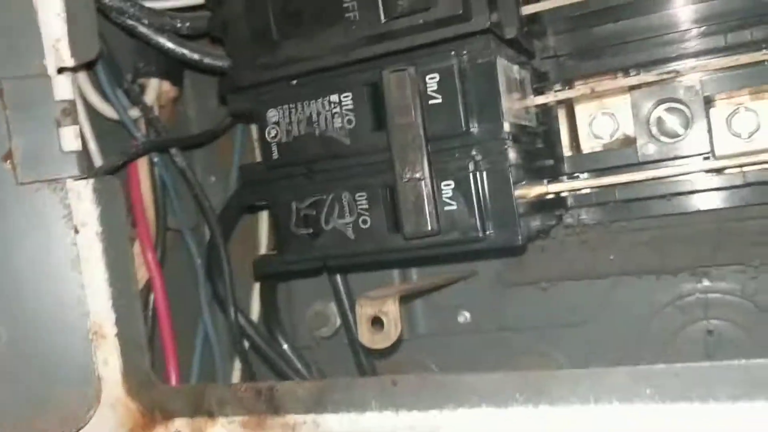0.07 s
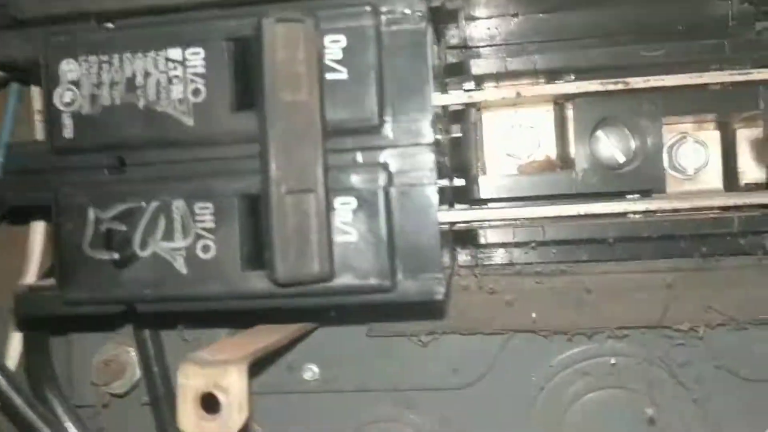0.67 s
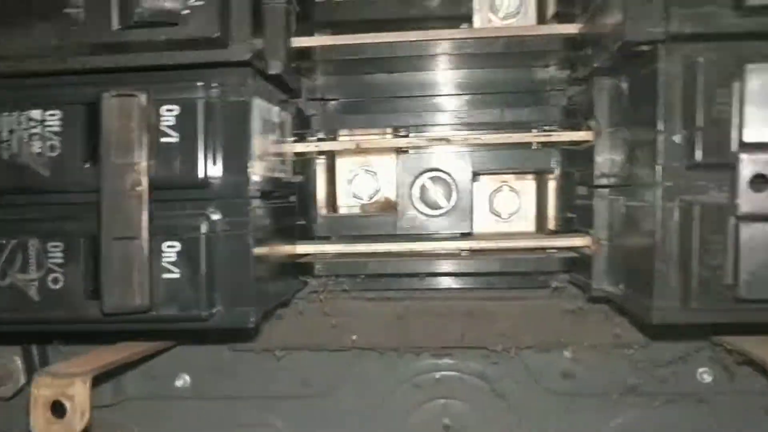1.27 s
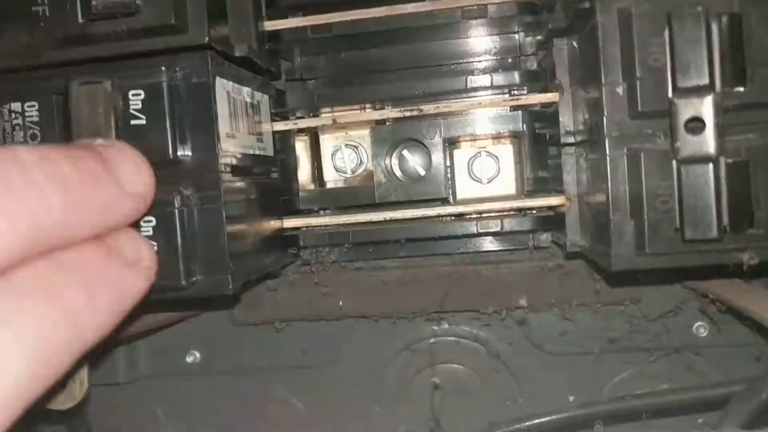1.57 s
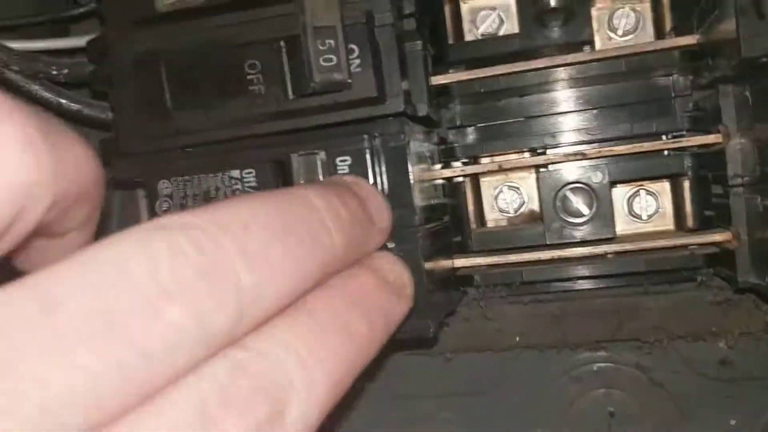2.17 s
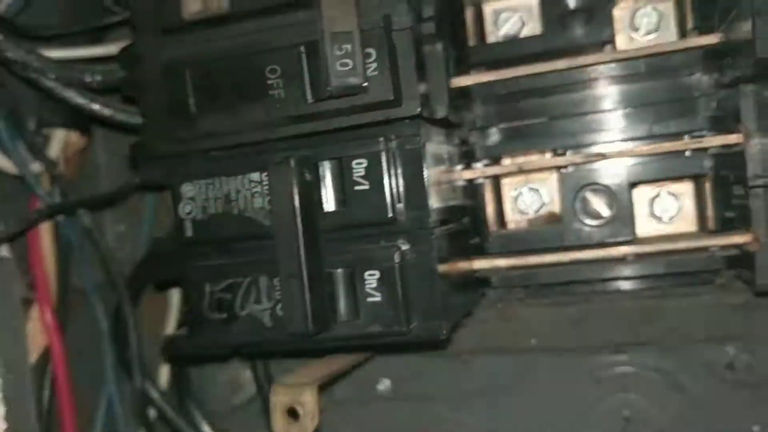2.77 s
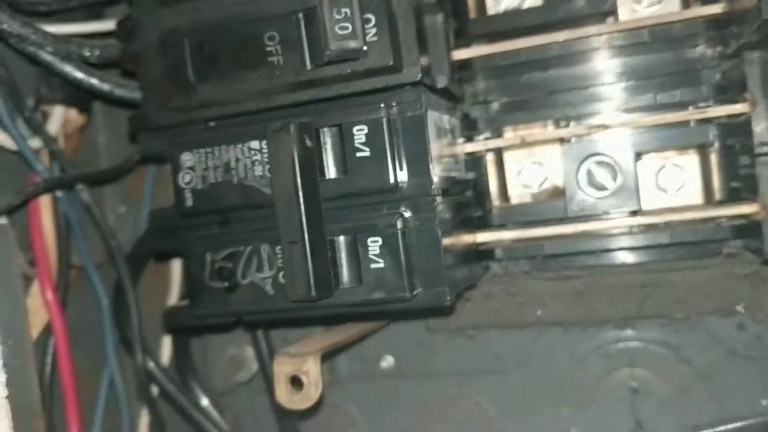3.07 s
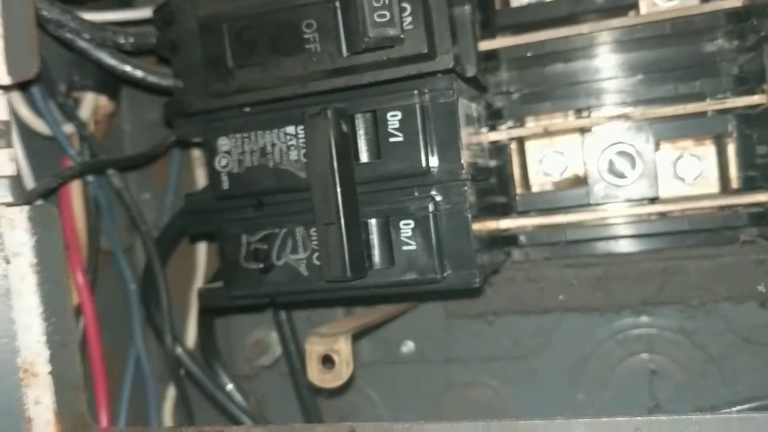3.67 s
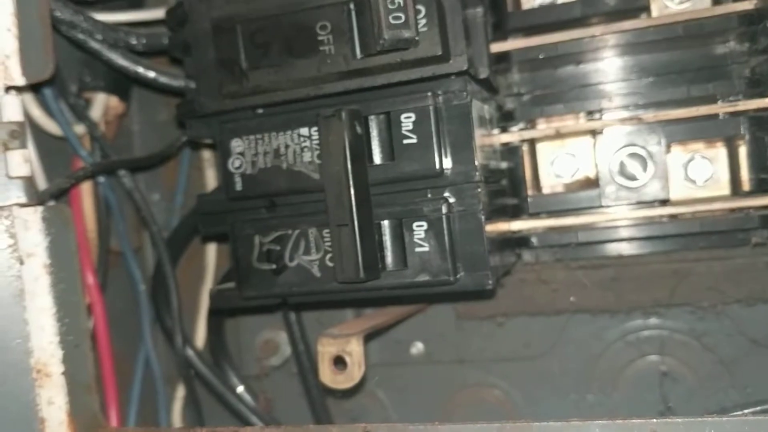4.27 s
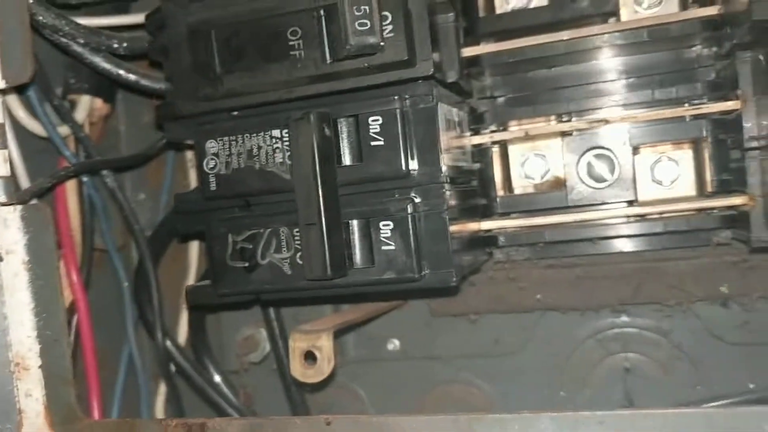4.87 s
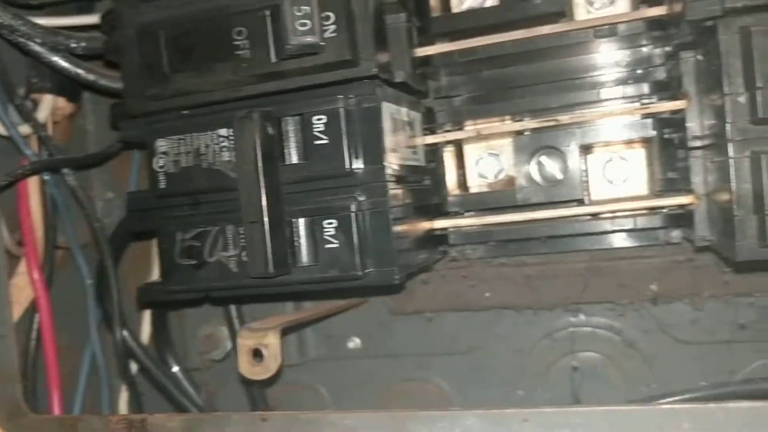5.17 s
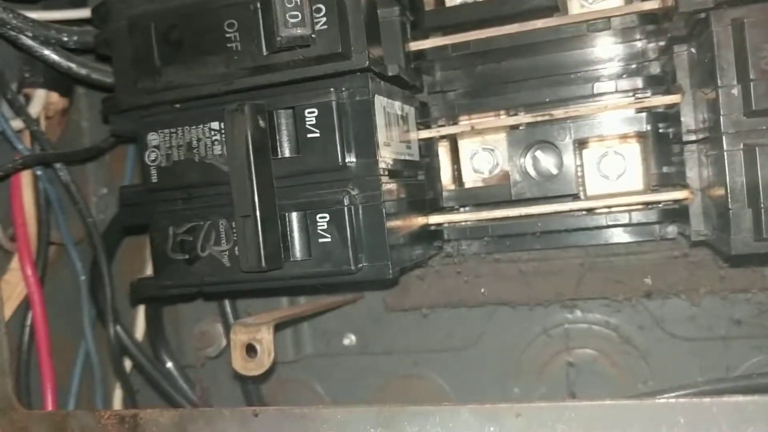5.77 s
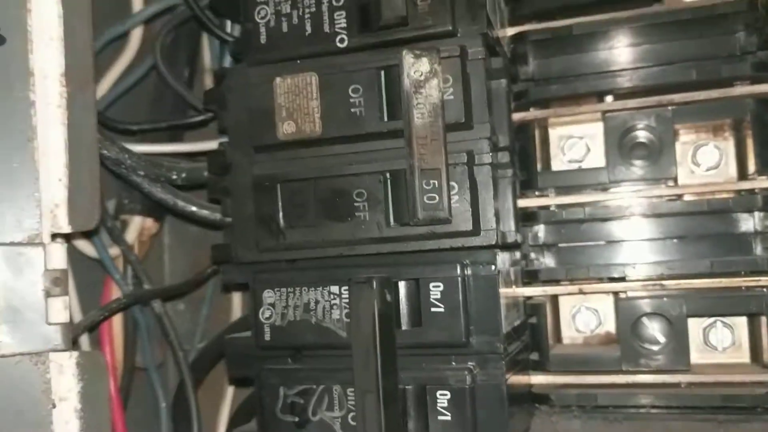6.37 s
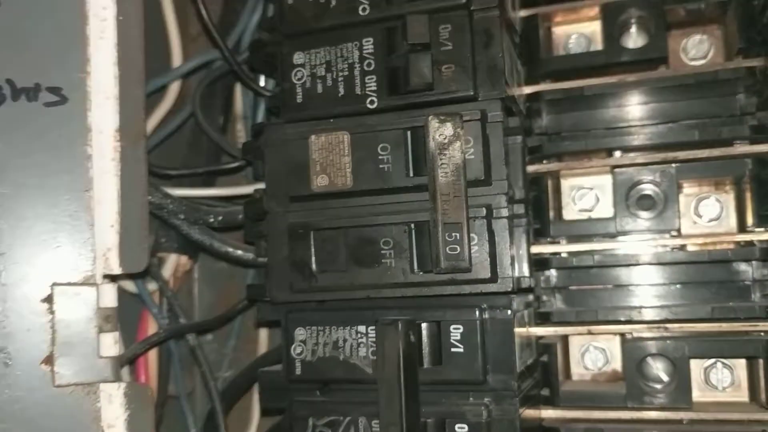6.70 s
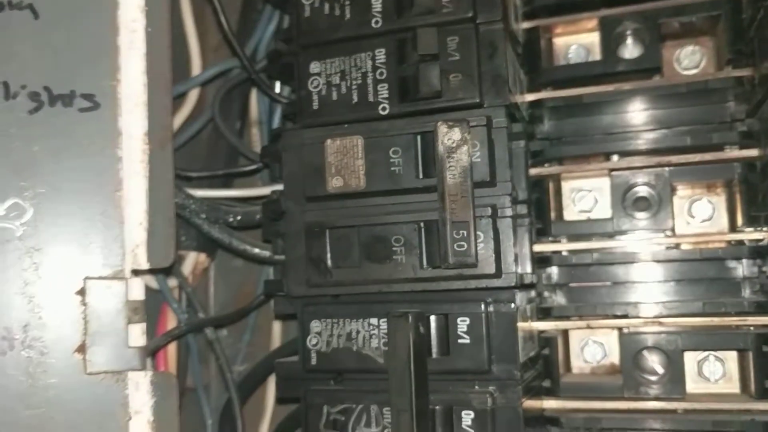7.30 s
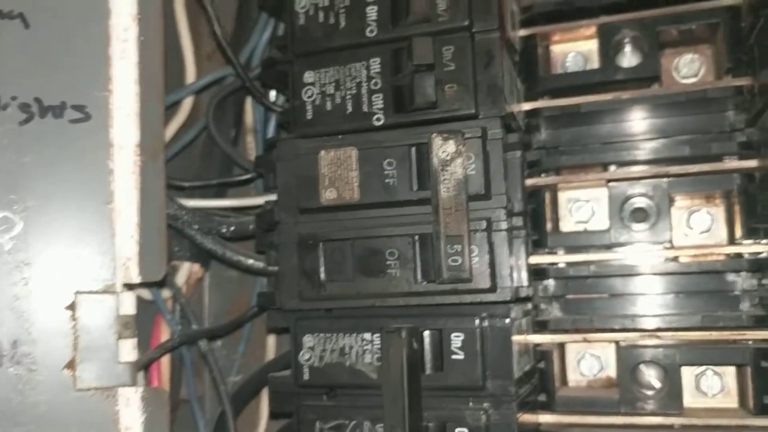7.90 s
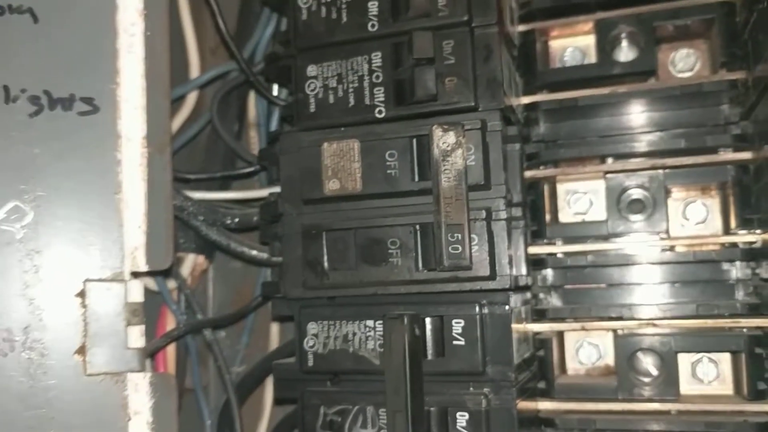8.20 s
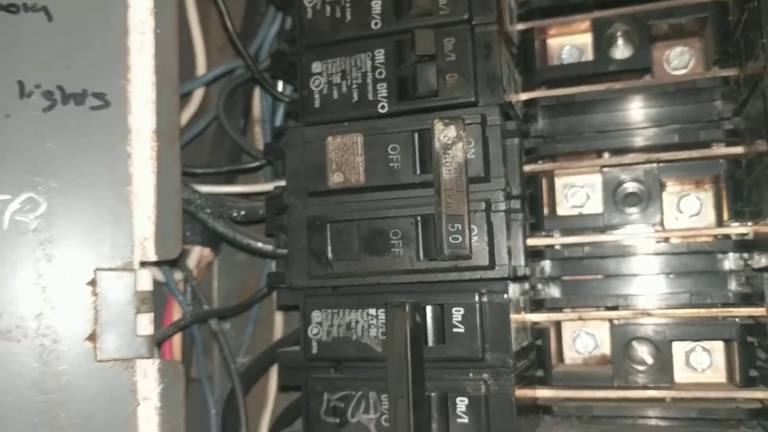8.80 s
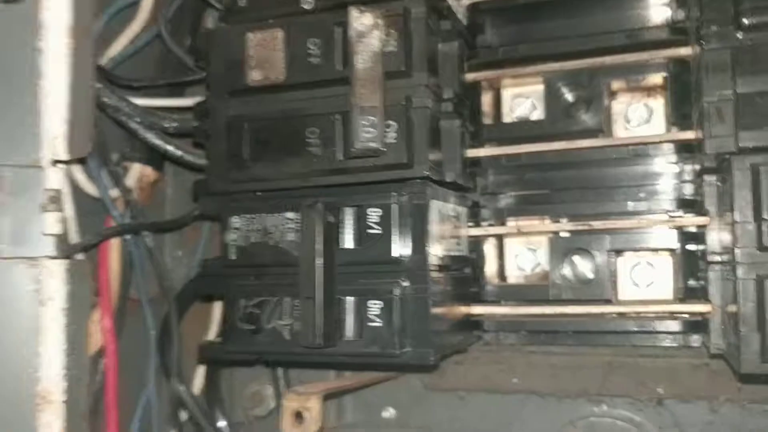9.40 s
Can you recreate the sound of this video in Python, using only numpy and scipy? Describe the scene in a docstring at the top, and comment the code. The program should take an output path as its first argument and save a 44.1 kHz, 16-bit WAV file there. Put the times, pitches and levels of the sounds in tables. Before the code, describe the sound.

Close by in a small room, a faint low hum carries a few tiny crackles. After about two seconds, fingers bump softly on a circuit breaker handle, and it snaps over with one loud, sharp clack. The steel panel rings briefly and fades. The quiet hum goes on with thin hiss and a faint distant rumble, and light crackling returns near the end.

```python
"""Circuit breaker thrown in a steel panel

Two fingers throw a double-pole breaker in an open panel, close by, in a small room.
The hand bumps softly, the latch ticks, the spring snaps the contacts over with a loud clack,
and the steel box rings on. Around it: faint bursts of crackle, low room hum, a swelling
distant rumble, thin hiss and electronic whine."""
import sys
import numpy as np
from scipy import signal
from scipy.fft import rfft, irfft, next_fast_len
from scipy.io import wavfile

SR = 44100
rng = np.random.default_rng(int(sys.argv[2]) if len(sys.argv) > 2 else 0)


def int16_out(signal):
    """Quantize to a 16-bit WAV file."""
    q = np.round(np.clip(np.atleast_2d(signal).T, -1, 1) * 32767)
    wavfile.write(sys.argv[1], SR, q.astype(np.int16))


N = 425565

# standing waves of the room: f/Hz, width/Hz, boost/dB
STANDING_WAVES = [(58.4, 4, 3), (119, 3.1, 5), (142.85, 6, 6), (183, 10, 8.5), (240.74, 8.1, 10),
                  (270, 10, 9), (328, 12.01, 8.1), (475, 8.8, 7.4)]
# spells of weak ticks over a fine sizzle: start/s, end/s, tick peak/dB, sizzle level/dB
CRACKLE_SPELLS = [(0, .24, -67, -75), (1.772, 2.123, -65, -86), (6.832, 6.87, -63, -85),
                  (7.35, 7.66, -66.5, -86), (8.124, 8.58, -64, -84), (8.593, 8.925, -62.5, -70.5),
                  (8.99, 9.372, -63.5, -75)]
SPELL_FADE_DB_PER_S = 7


def from_db(db):
    """Decibels to gain."""
    return 10 ** (np.asarray(db) / 20)


def unit_rms(x):
    """Scale to rms 1."""
    return x / np.sqrt(np.mean(x ** 2) + 1e-20)


def at_hz(table, hz, column=1):
    """Interpolate a table column over log frequency."""
    rows = np.array(table)
    return np.interp(np.log(hz + 1e-3), np.log(rows[:, 0]), rows[:, column])


def seconds(length_s):
    """Time axis."""
    return np.arange(int(length_s * SR)) / SR


def add(track, start_s, sound):
    """Mix a sound into a track."""
    start = round(start_s * SR)
    track[start:start + len(sound)] += sound[:len(track) - start]


def cut(x, hz, side):
    """Second-order high- or low-pass."""
    return signal.sosfilt(signal.butter(2, min(hz, .45 * SR), side, fs=SR, output="sos"), x)


def noise(spectrum, peaks=(), size=N):
    """Noise of rms 1 with a spectrum (f/Hz, density/dB) and peaks (f/Hz, width/Hz, boost/dB)."""
    padded = next_fast_len(size, real=True)
    hz = np.fft.rfftfreq(padded, 1 / SR)
    gain = from_db(at_hz(spectrum, hz))
    for centre_hz, width_hz, db in peaks:
        detuning = 2 * (hz - centre_hz) / width_hz
        gain *= np.sqrt(1 + (from_db(db) ** 2 - 1) / (1 + detuning ** 2))
    white = rfft(rng.standard_normal(padded))
    return unit_rms(irfft(white * gain, padded)[:size])


def dense_modes(table, t):
    """Overlapping modes as half-octave noise bands, each with its own decay; starts at rms 1."""
    edges_hz = np.geomspace(35, 17000, 19)
    out, power = np.zeros(len(t)), 0
    for low, high in zip(edges_hz, edges_hz[1:]):
        hz = np.sqrt(low * high)
        fade = from_db(-60 * t / at_hz(table, hz, column=2))
        bandpass = signal.butter(3, [low, high], "band", fs=SR, output="sos")
        band = signal.sosfilt(bandpass, rng.standard_normal(len(t)) * fade)
        gain = from_db(at_hz(table, hz)) * np.sqrt(high - low)
        out += gain * unit_rms(band) * np.sqrt(np.mean(fade ** 2))
        power += gain ** 2
    return out / np.sqrt(power)


def ring(modes, t):
    """Struck modes (f/Hz, level/dB, t60/s) as decaying sines of alternating sign."""
    return sum((-1) ** k * from_db(db - 60 * t / t60_s) * np.sin(2 * np.pi * hz * t)
               for k, (hz, db, t60_s) in enumerate(modes))


def hum(level_db=-61.5):
    """Steady low noise, coloured by the room's standing waves."""
    # hum spectrum: f/Hz, relative density/dB
    spectrum = [(20, -30), (35, -16), (48, 2), (70, -3), (92, 0.5), (125, -9), (160, -18), (250, -23),
                (500, -30), (900, -40), (2000, -60)]
    return from_db(level_db) * noise(spectrum, STANDING_WAVES)


def rumble(lull_db=-76.5, rise_db_per_s=28.0, fall_db_per_s=32.0):
    """Distant rumble in the same standing waves; each swell rises from the lull, holds and falls."""
    # rumble spectrum: f/Hz, relative density/dB
    spectrum = [(100, -11.5), (180, -1), (260, 0.5), (400, -3), (560, -3), (800, -11), (1400, -23.5),
                (2500, -36.5)]
    # swell crests: t/s, level/dB, hold/s
    swells = [(.22, -67.5, .5), (2.38, -65, 0.079), (4.02, -66, 0.43), (5.25, -70, .08), (5.92, -71, .15),
              (7.02, -72, .08), (7.95, -66, .1), (9.62, -69.5, .08)]
    t = np.arange(N) / SR
    power = from_db(lull_db) ** 2
    for crest_s, db, hold_s in swells:
        early_s = np.maximum(crest_s - hold_s / 2 - t, 0)
        late_s = np.maximum(t - crest_s - hold_s / 2, 0)
        power += from_db(db - rise_db_per_s * early_s - fall_db_per_s * late_s) ** 2
    return np.sqrt(power) * noise(spectrum, STANDING_WAVES)


def whine():
    """Thin electronic whine: narrow noise bands."""
    # whine bands: f/Hz, width/Hz, level/dB
    bands = [(4260, 70, -96), (11630, 50, -99.5), (12950, 220, -95)]
    t, out = np.arange(N) / SR, np.zeros(N)
    for hz, width_hz, db in bands:
        flutter = cut(rng.standard_normal(N), width_hz / 2, "low")
        out += from_db(db) * unit_rms(flutter * np.sin(2 * np.pi * hz * t))
    return out


def hiss(level_db=-75.0):
    """Thin, steady broadband noise."""
    # hiss spectrum: f/Hz, relative density/dB
    spectrum = [(300, -2.5), (1000, 4.5), (1900, 0), (2700, 1.5), (4100, 0), (4600, -3), (6700, -6.5),
                (7750, -1), (8200, -3.5), (8600, -2.5), (10000, -12), (12200, -12.5), (15500, -11.5)]
    return from_db(level_db) * noise(spectrum)


def weak_ticks(max_per_spell=16, gap_s=0.04, log_jitter=.25, spread_db=2.5):
    """An uneven, slowly weakening run of ticks per spell; returns rows of t/s, peak/dB."""
    ticks = []
    for start_s, end_s, db, _ in CRACKLE_SPELLS:
        gap_draws, level_draws = rng.standard_normal((max_per_spell, 2)).T
        gaps_s = gap_s * np.exp(log_jitter * gap_draws)
        ages_s = np.cumsum(gaps_s) - gaps_s[0]
        peaks_db = db - SPELL_FADE_DB_PER_S * ages_s + spread_db * level_draws
        ticks += [(at_s, peak) for at_s, peak in zip(start_s + ages_s, peaks_db) if at_s < end_s]
    return ticks


def crackle(crest_db=7.0, tick_t60_s=0.07, echo_s=0.0077, echo_db=-2.0, tail_db=-7.0, tail_t60_s=.22):
    """Tiny dry resonant ticks, each with a reflection and a short tail, and spells of sizzle."""
    # clearest ticks: t/s, peak/dB
    clear_ticks = [(0.0064, -59), (0.1024, -62), (1.8404, -58.5), (1.8744, -57.5), (1.9244, -57.5),
                   (1.9734, -58.5), (2.0502, -56), (2.0754, -56), (3.6074, -60), (3.6494, -58.5),
                   (6.0884, -56), (6.8664, -59), (7.3272, -56.5), (7.4824, -58), (7.5692, -54),
                   (7.6504, -58.5), (8.1529, -55), (8.2277, -55.5), (8.319, -55), (8.3604, -54.5),
                   (8.4014, -56.5), (8.4607, -54), (8.5121, -55.5), (8.5609, -54), (8.9516, -56.5),
                   (9.0194, -57), (9.1504, -58.5), (9.592, -56)]
    # crackle spectrum: f/Hz, relative density/dB
    spectrum = [(500, -5), (1200, -1), (3000, 2.5), (4200, -1.5), (4500, -3.5), (5100, 2), (6200, -5.5),
                (7800, -6.5), (8600, -2), (11200, -7.5), (12400, -6.5), (13300, -9), (15500, -9.5)]
    # tick resonances: f/Hz, width/Hz, boost/dB
    resonances = [(3390, 140, 9.3), (5290, 125, 10.3), (12400, 400, 4.5)]
    t, power = seconds(.5), np.zeros(N)
    for at_s, peak_db in list(clear_ticks) + weak_ticks():
        rms_db = peak_db - crest_db
        tick = from_db(rms_db - 60 * t / tick_t60_s)
        tail = from_db(rms_db + tail_db - 60 * t / tail_t60_s)
        add(power, at_s, tick ** 2)
        add(power, at_s + echo_s, (from_db(echo_db) * tick) ** 2 + tail ** 2)
    for start_s, end_s, _, db in CRACKLE_SPELLS:
        sizzle = from_db(db - SPELL_FADE_DB_PER_S * seconds(end_s - start_s))
        add(power, start_s, sizzle ** 2 * signal.windows.tukey(len(sizzle), .5))
    return np.sqrt(power) * noise(spectrum, resonances)


def fingers(thud_hz=55.0, thud_t60_s=.2, thud_rise_s=.0036, tick_t60_s=.05, tick_rise_s=.0018):
    """Skin meets the handle: a soft tick with a plastic knock in it, and a low thud."""
    # touches on the handle: t/s, tick level/dB, thud level/dB
    touches = [(2.12, -61, -42.5), (2.196, -75.5, -40.5), (2.2450, -50, -36), (2.325, -71, -52),
               (2.375, -71, -47), (2.455, -72, -49), (2.514, -42, -50.5)]
    skin_spectrum = [(200, 1.5), (1500, -2), (2900, -2), (3600, -9), (7500, -7.5), (15000, -16)]
    plastic_knock = [(2440, 260, 9)]
    t, out = seconds(.5), np.zeros(N)
    for at_s, tick_db, thud_db in touches:
        tick = noise(skin_spectrum, plastic_knock, len(t)) * from_db(tick_db - 60 * t / tick_t60_s)
        thud = ring([(thud_hz, thud_db, thud_t60_s)], t)
        add(out, at_s, tick * (1 - np.exp(-t / tick_rise_s)))
        add(out, at_s, thud * (1 - np.exp(-t / thud_rise_s)))
    return out


def room_tail(t, level_db=-38.0, build_s=.014):
    """Reverberation of the snap: room modes build up and die away."""
    # room reverberation: f/Hz, relative density/dB, t60/s
    decay = [(60, 1, .4), (150, 1.5, .45), (350, 1.5, 0.45), (800, -1.5, 0.4), (1499.6, -1, .6),
             (2500, 1.5, .53), (3600, -0.5, .53), (5200, 3, .52), (7500, -1, .42), (10000, -5.5, 0.47),
             (15000, -8, .31)]
    return from_db(level_db) * dense_modes(decay, t) * (1 - np.exp(-t / build_s))


def steel_panel(t, steel_db=-50):
    """The jolted box rings on while the whole panel rocks on the wall."""
    # modes of box and springs: f/Hz, relative level/dB, t60/s
    steel_modes = [(245, -19, 2.2), (484, -22, 2.8), (592, -17.5, 2.2), (947, -19, 1.5), (1429, -15, 1.6),
                   (1480, -10, .9), (1497, -6, 1.3), (1717, -20, 3.2), (1852, -16, 1.5), (1913, -3, .52),
                   (2343, -1, .43), (2837, -7, .55), (3252, -11, .62), (4963, -5, .45), (7397, -2, .6),
                   (7488, -1, .6), (11300, -12, .85)]
    # rocking modes: f/Hz, level/dB, t60/s
    rocking_modes = [(62.05, -44, .17), (88, -37, .11), (117.01, -38, .13), (176, -39, 0.1),
                     (416.7, -35.5, .07)]
    return from_db(steel_db) * ring(steel_modes, t) + ring(rocking_modes, t)


def moulded_case(t, level_db=-9.0):
    """Case and handle ring briefly; the wider a mode, the sooner it dies."""
    # modes of case and handle: f/Hz, width/Hz, relative level/dB
    resonances = [(414, 60, -33), (654, 34, -30), (952, 48, -22.5), (1425, 62, -14.5), (1560, 26, -21.5),
                  (1725.6, 84, -15.5), (2113, 28, -20), (2414, 42, -9), (2510, 81, -9), (2724, 91, -11),
                  (3256, 68, -8.5), (4229, 100, -3.5), (4440, 87, -5.5), (4698, 209, -1.43),
                  (5020, 116, -7), (5452, 76, -7.5), (5960, 80, -5.5), (6280, 77, -14), (7623, 140, 0.5),
                  (7870, 80, -7), (8000, 259, -4.5), (8770, 220, -3.0), (9740, 200, -1.5), (10000, 259, -5),
                  (10060, 100, -8), (11060, 80, -7.5), (11200, 215, -4.5), (12300, 380, -3.5),
                  (13400, 259, -4.5), (15083, 259, -6)]
    modes = [(hz, db, np.log(1000) / (np.pi * width_hz)) for hz, width_hz, db in resonances]
    return from_db(level_db) * ring(modes, t)


def breaker(crack_db=-17.0, ping_db=-10.0, ping_t60_s=0.0052, wall_s=.0208, wall_db=-19.0, wall_hz=7000):
    """Latch ticks lead up to the snap, which rings case and steel; a near wall and the room answer."""
    # impacts inside the breaker: t/s, gain/dB, lowest radiated f/Hz, ping f/Hz
    impacts = [(2.4904, -34, 5500, 8300), (2.5027, -19, 5000, 6000), (2.5084, -29, 5000, 8500),
               (2.5231, -5, 1500, 6300), (2.5245, -3, 900, 3000), (2.5251, 0, 300, 4500),
               (2.5279, -3, 600, 4400), (2.5299, -2, 100, 2200)]
    # dense, damped vibration of case and mounting rail: f/Hz, relative density/dB, t60/s
    crack_decay = [(40, -20.5, .2), (85, 7, .14), (169.9, 1.5, 0.047), (280, -9, 0.033), (600, -4, 0.06),
                   (1100, -1.5, 0.075), (2300, 1.5, .06), (5000, 0.5, 0.055), (9000, 3.5, 0.032),
                   (15000, 3.5, .022)]
    t_long, t_short, out = seconds(1.6), seconds(.2), np.zeros(N)
    for at_s, db, low_hz, ping_hz in impacts:
        crack = from_db(crack_db) * dense_modes(crack_decay, t_short)
        ping = ring([(ping_hz, ping_db, ping_t60_s)], t_short)
        add(out, at_s, from_db(db) * cut(crack + ping, low_hz, "high"))
    snap_s = max(impacts, key=lambda row: row[1])[0]   # hardest blow
    add(out, snap_s, moulded_case(t_short))
    wall_echo = from_db(wall_db) * cut(out + 1e-18, wall_hz, "low")
    add(out, wall_s, wall_echo)
    add(out, snap_s, steel_panel(t_long) + room_tail(t_long))
    return out


def scene():
    """All sources at one microphone."""
    return (breaker() + fingers() + crackle() + hum() + rumble() + whine() + hiss())[None, :]


def record(dry, ceiling=0.96, low_hz=36.0, high_hz=15900):
    """Small microphone: deepest bass lost, peaks rounded, top treble cut."""
    rounded = ceiling * np.tanh(cut(dry, low_hz, "high") / ceiling)
    steep_lowpass = signal.ellip(10, .1, 80, high_hz, fs=SR, output="sos")
    return signal.sosfilt(steep_lowpass, rounded)


dry = scene()
out = record(dry)
int16_out(out)
```